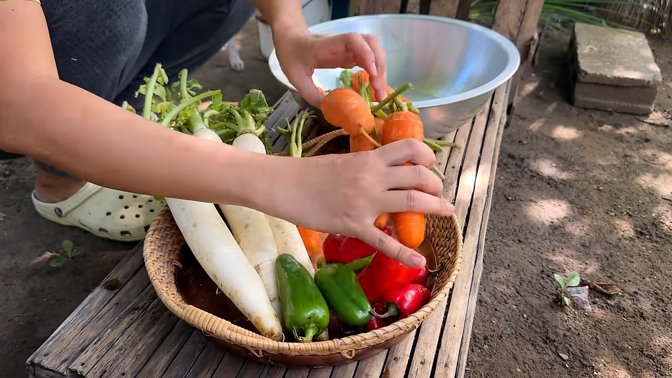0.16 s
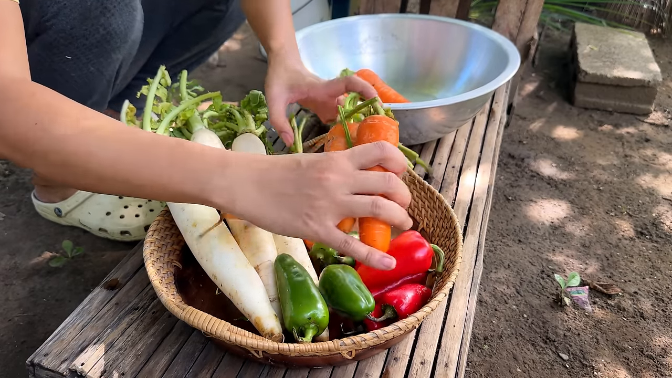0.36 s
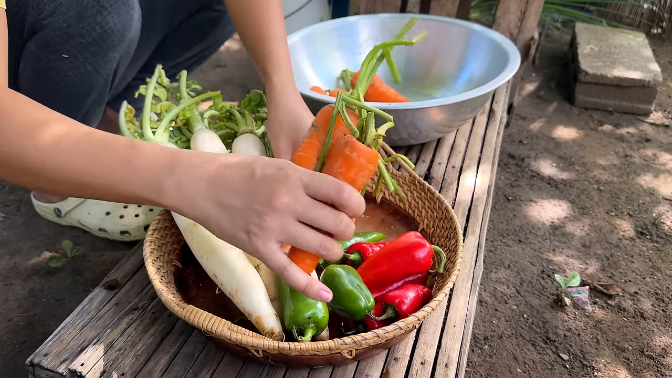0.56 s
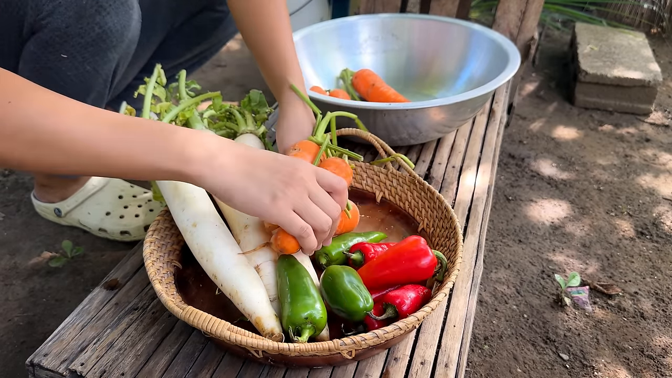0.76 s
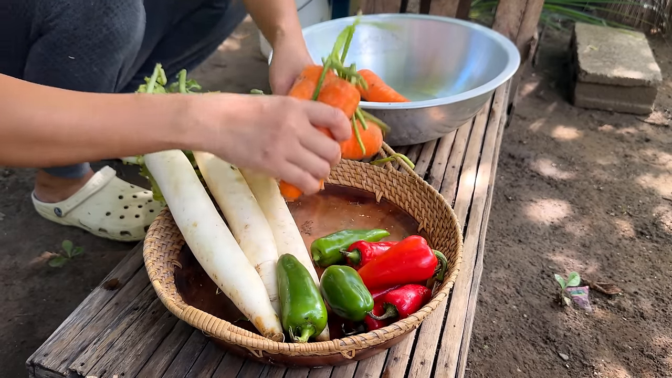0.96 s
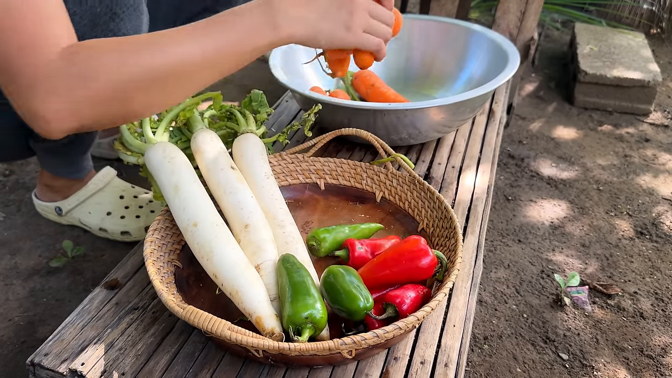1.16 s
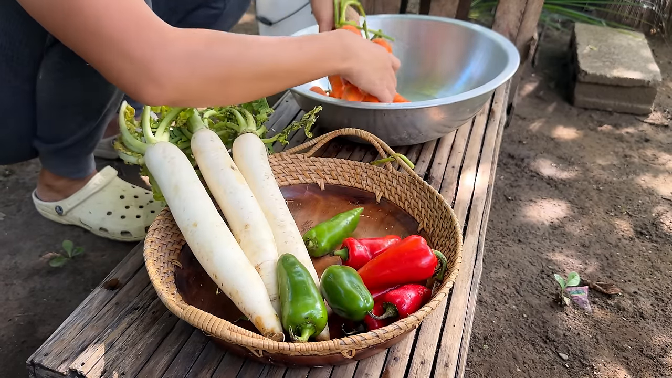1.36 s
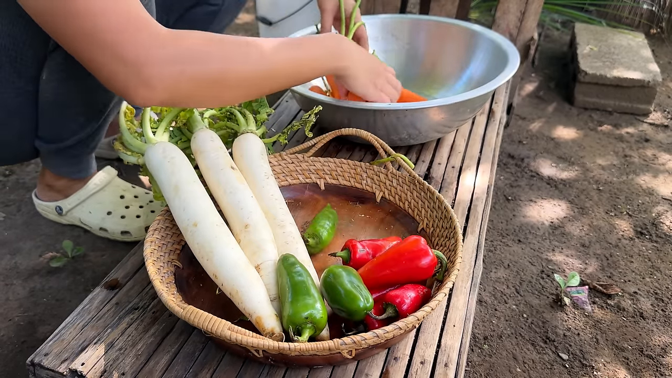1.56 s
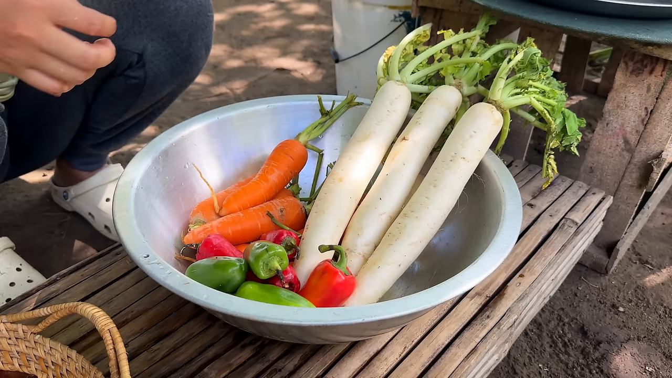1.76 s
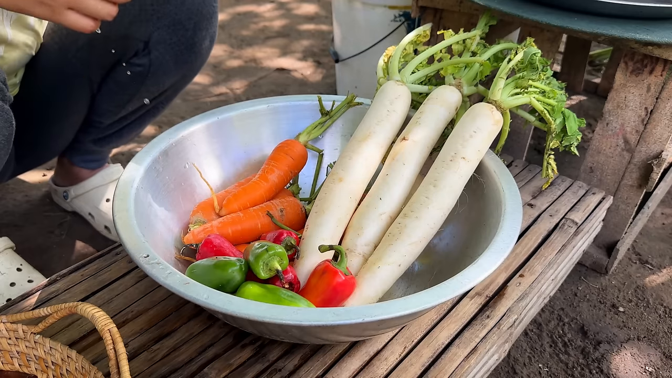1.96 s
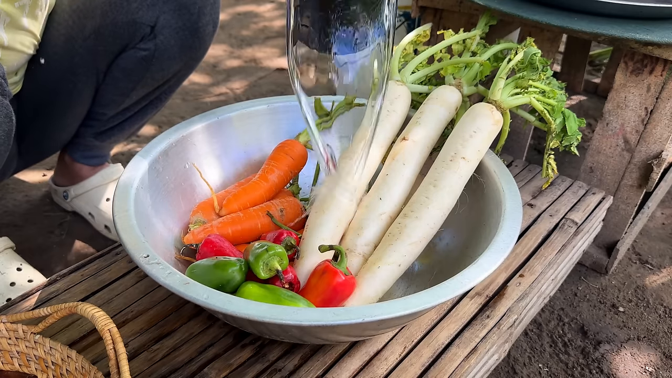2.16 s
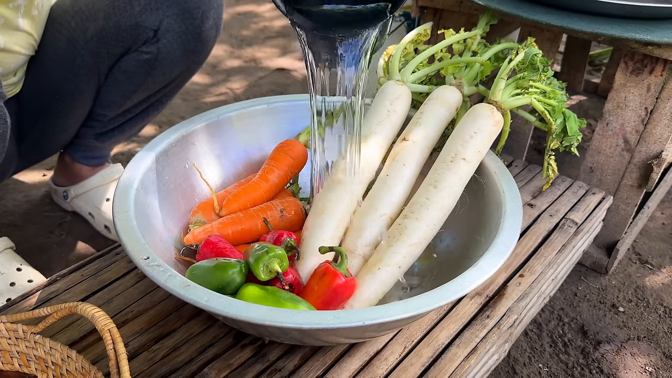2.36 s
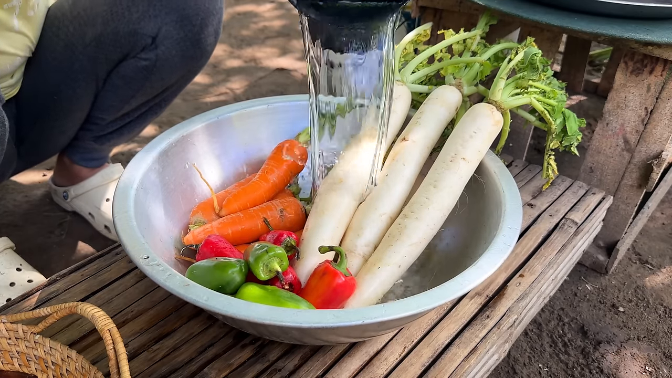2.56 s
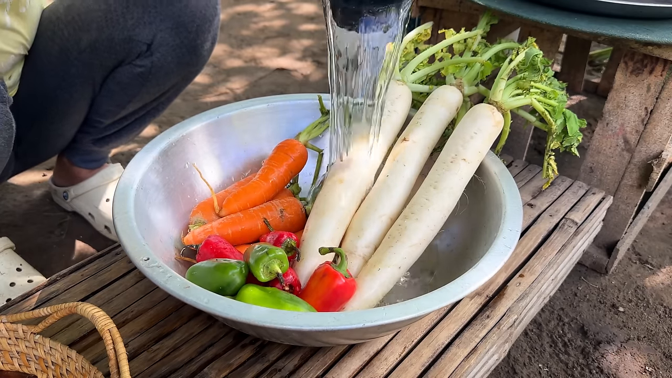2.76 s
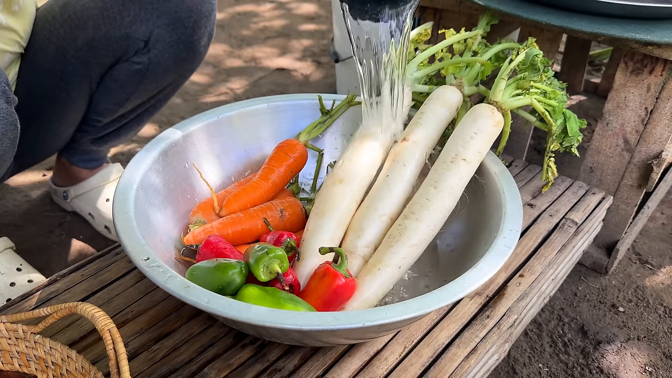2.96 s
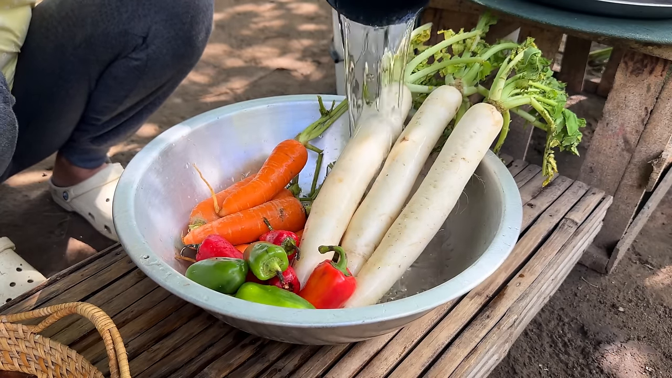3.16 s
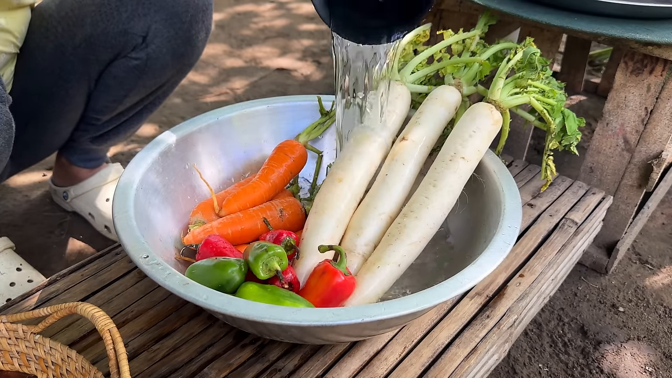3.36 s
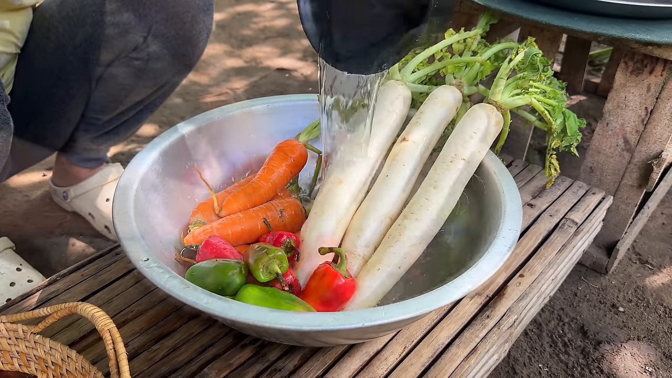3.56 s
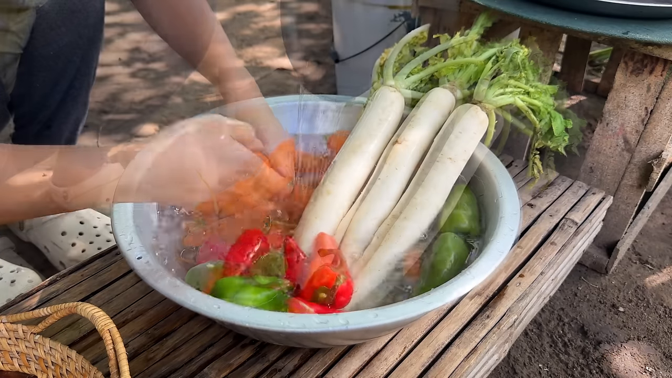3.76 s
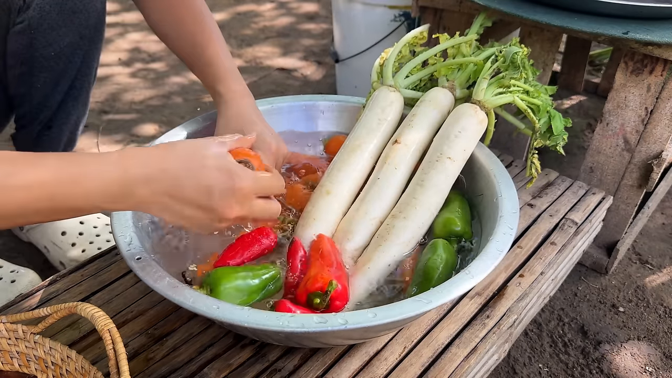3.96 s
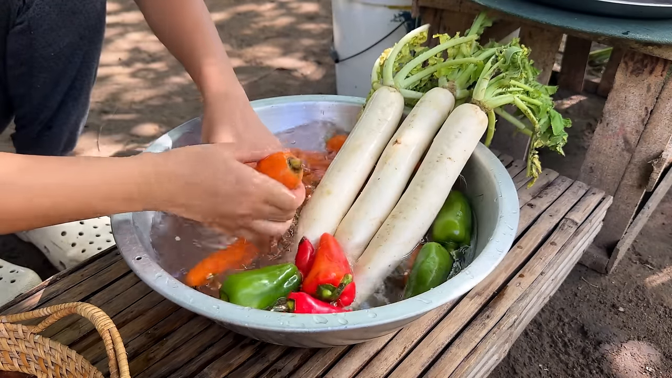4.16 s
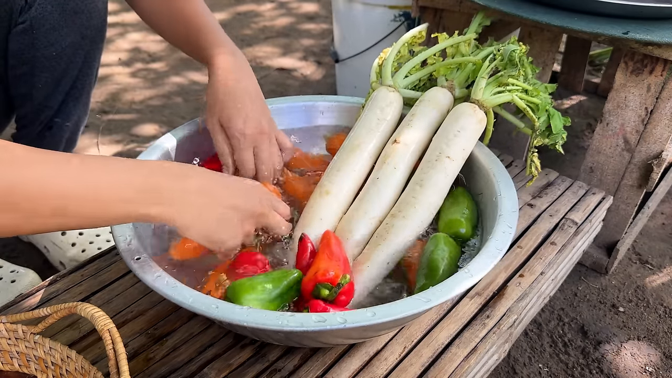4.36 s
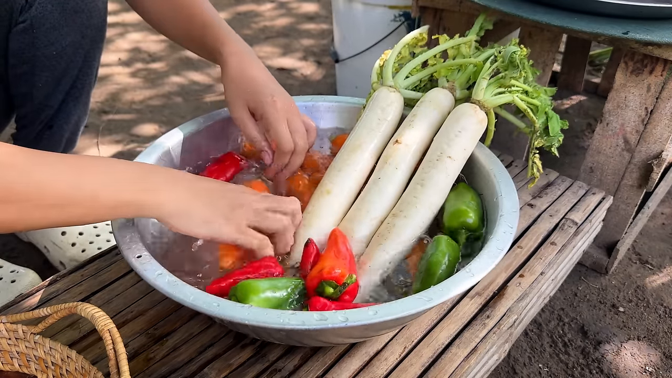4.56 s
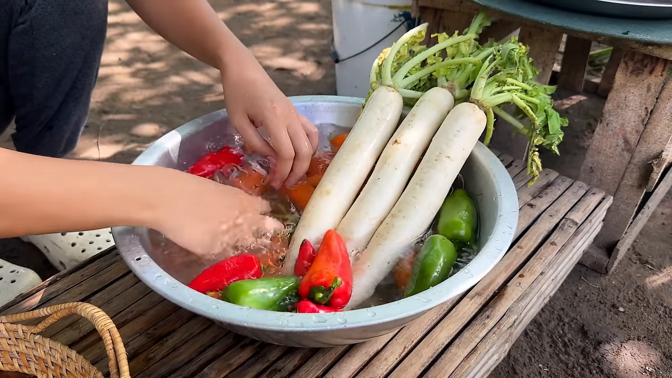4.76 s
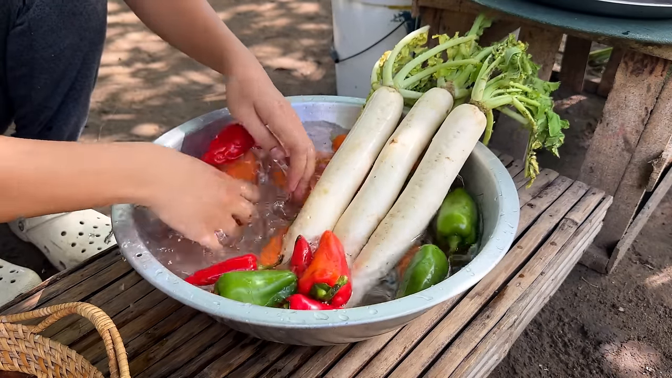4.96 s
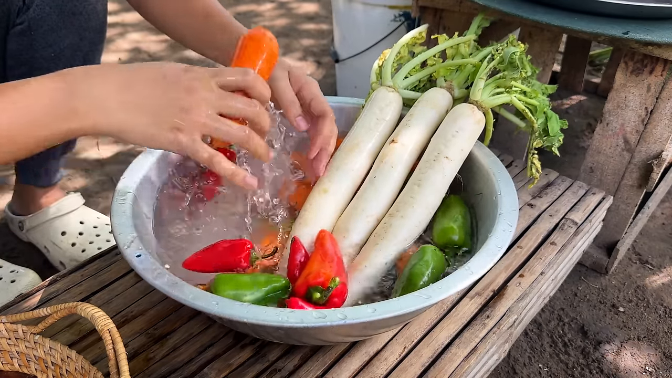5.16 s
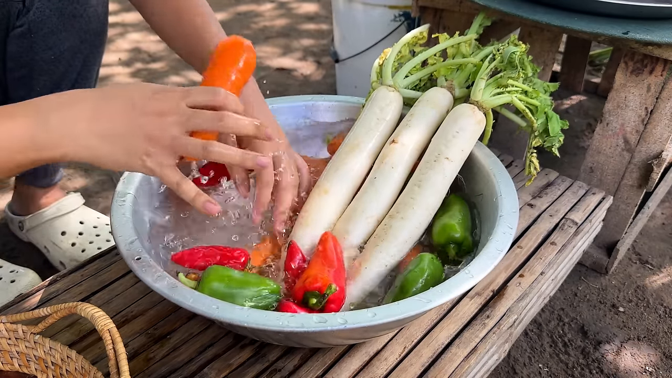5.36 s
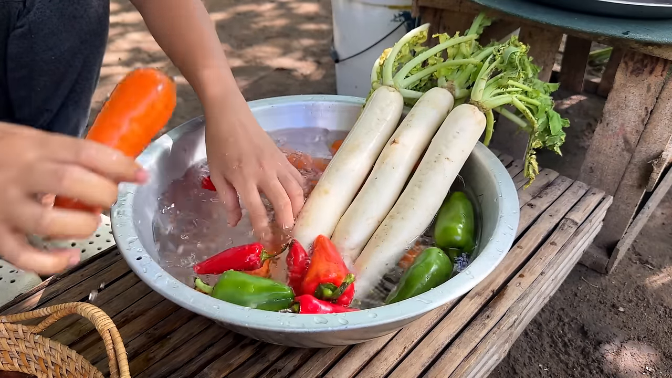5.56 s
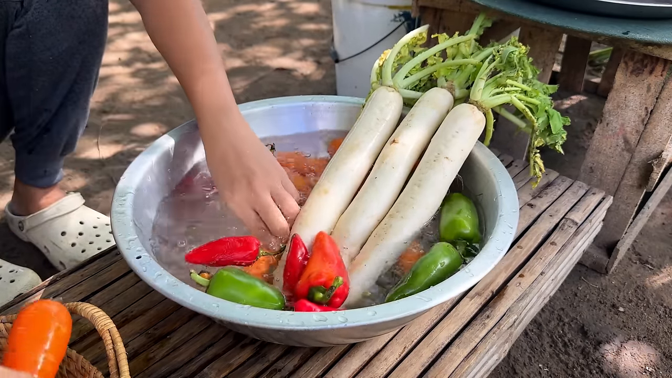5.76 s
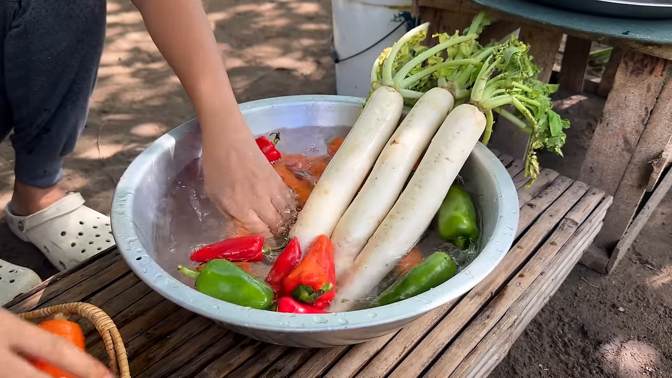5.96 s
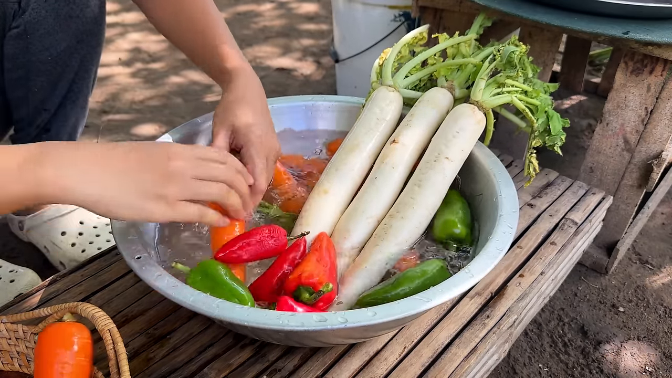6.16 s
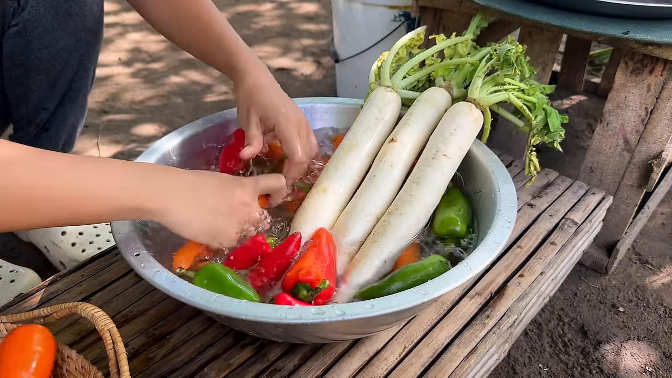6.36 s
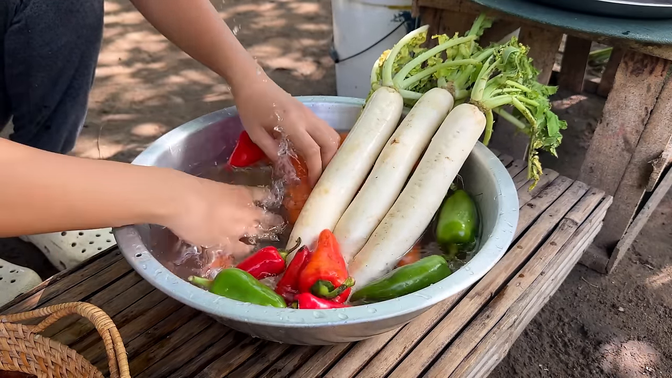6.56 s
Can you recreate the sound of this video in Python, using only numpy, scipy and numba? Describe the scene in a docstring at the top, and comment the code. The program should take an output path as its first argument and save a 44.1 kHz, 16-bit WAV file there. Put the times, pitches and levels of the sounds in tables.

```python
"""Vegetables are washed in a basin: water pours from a bucket, then hands slosh (shaped bubble swarms and noise).
Air pockets plop as rising, decaying sines; slaps are short filtered noise bursts.
Before that, more distantly, carrots knock in a basket and thud into the metal basin (struck modes and noise).
Chicks peep throughout and hens murmur in the first second (gliding tones), over yard air (noise)
and a far engine (low sine). At 1.757 s the scene jumps close to the basin; two basket knocks come later."""
import sys
import numpy as np
from scipy import signal
from scipy.fft import rfft, irfft, next_fast_len
from scipy.io import wavfile
from scipy.ndimage import uniform_filter1d
from numba import njit

SR = 44100
rng = np.random.default_rng(int(sys.argv[2]) if len(sys.argv) > 2 else 0)


def wrap_up_sound(samples):
    """Save the sound to the file named by the first command line argument, as 16-bit audio."""
    columns = np.atleast_2d(samples).T
    # keep every value between -1 and 1, then stretch to whole-number steps
    tamed = np.clip(columns, -1, 1)
    steps = np.round(tamed * 32767).astype(np.int16)
    wavfile.write(sys.argv[1], SR, steps)


N = 291060
TIME = np.arange(N) / SR
JUMP_S = 1.757  # from the distant view to the close one
# spray and drop spectrum: (frequency [Hz], gain [dB])
SPRAY_SPECTRUM = [(1500, -6), (2600, 0.5), (5500, 0.5), (7200, -6), (8500, -3), (10000, -9.5), (14300, -4)]


def amp(db):
    """Decibels to gain."""
    return 10 ** (np.asarray(db) / 20)


def unit(x):
    """Scale to rms 1."""
    return x / np.sqrt(np.mean(x ** 2))


def curves(rows):
    """Interpolate each column of a time table at every sample."""
    s, *columns = np.transpose(rows)
    return [np.interp(TIME, s, c) for c in columns]


def during(start_s, end_s, fade_s=.01):
    """Gate: 1 between two moments, with linear ramps inside."""
    rise = np.clip((TIME - start_s) / fade_s, 0, 1)
    fall = np.clip((end_s - TIME) / fade_s, 0, 1)
    return rise * fall


def colour(x, points):
    """Causal minimum-phase filter through (Hz, dB) points, by way of the cepstrum."""
    hz, db = np.transpose(points)
    size = 2 * next_fast_len(x.shape[-1])
    bin_hz = np.arange(size // 2 + 1) * SR / size
    gain_db = np.interp(np.log(bin_hz + 1), np.log(hz), db)
    cepstrum = irfft(np.log(amp(gain_db)))
    # fold onto positive time
    cepstrum[1:size // 2] *= 2
    cepstrum[size // 2 + 1:] = 0
    return irfft(rfft(x, size) * np.exp(rfft(cepstrum)))[..., :x.shape[-1]]


def walk(rate_hz):
    """Slow random curve of rms about 1: smoothed random steps."""
    k = int(SR / rate_hz)
    steps = np.repeat(rng.standard_normal(N // k + 1), k)
    return unit(uniform_filter1d(steps, k)[:N])


def add(out, s, sound):
    """Mix a sound in at a moment."""
    i = max(int(s * SR), 0)
    out[..., i:i + sound.shape[-1]] += sound[..., :max(N - i, 0)]


def ticks(length_s):
    """Time axis of a short sound."""
    return np.arange(int(length_s * SR)) / SR


def place(x, lead_ms, pan_db, echo_db, t60):
    """Stereo position by left lead and left-over-right level, plus decaying scatter unlike in each port."""
    t = ticks(0.27)
    scatter = rng.standard_normal((2, len(t))) * amp(-60 * t / t60) * (1 - np.exp(-t / 0.0018))
    scatter = colour(scatter / np.sqrt(np.sum(scatter[0] ** 2)), [(200, 0.42), (1000, 4.9), (2500, 9.2)])
    left = x * amp(pan_db / 2)
    right = np.interp(TIME - lead_ms / 1000, TIME, x) * amp(-pan_db / 2)
    echoes = signal.fftconvolve(x[None], scatter, axes=1)[:, :N]
    return np.array([left, right]) + amp(echo_db) * echoes


@njit
def ring(s, size, hz, cycles, glide):
    """Bubbles: sines that swell within a cycle or two, fade 50 dB in their cycles and rise by the glide share."""
    out = np.zeros(N)
    for k in range(len(s)):
        start = max(int(s[k] * SR), 0)
        n = int(cycles[k] * SR / hz[k])
        phase = 0.
        for i in range(min(n, N - start)):
            phase += hz[k] * (1 + glide * i / n) / SR
            envelope = (1 - np.exp(-phase * phase)) * np.exp(-5.8 * i / n)
            out[start + i] += size[k] * envelope * np.sin(2 * np.pi * phase)
    return out


def cloud(count, low_hz, high_hz, cycles, spread_db, lead_ms, wide_ms):
    """Bubble swarm with random pitches, levels and lives; each bubble has its own stereo place."""
    when, pitch, chance, life, across, pan = rng.random((count, 6)).T
    hz = low_hz * (high_hz / low_hz) ** pitch
    size = amp(-spread_db * np.log(chance + 0.00087)) * hz / high_hz  # spread_db > 0: a few far louder
    lead_s = (lead_ms + wide_ms * (2 * across - 1)) / 1000
    ports = []
    for side in (1, -1):
        start_s = when * N / SR - side * lead_s / 2
        side_size = size * amp(side * 8.6 * (pan - .5))
        ports.append(ring(start_s, side_size, hz, cycles * (.5 + life), 0.17))
    return unit(np.array(ports))


def yard(points, db):
    """Outdoor air as filtered noise: near-central rumble and wider hiss, each wavering on its own."""
    mid = colour(rng.standard_normal(N), points)
    side = colour(colour(rng.standard_normal(N), points), [(100, -17.0), (600, -1.5), (2500, 0.0)])
    air = unit(mid + side * np.array([[1], [-1]])) * amp(db)
    rumble = signal.sosfiltfilt(signal.butter(2, 220, fs=SR, output="sos"), air)
    hiss = air - rumble
    return rumble * amp(2.3 * walk(14)) + hiss * amp(3.83 * walk(10))


def hum(rows, waver_db):
    """Far engine: its lowest note alone, a sine wavering in pitch and, where waver_db is set, in level."""
    hz, db = curves(rows)
    phase = 2 * np.pi * np.cumsum(hz * (1 + 0.011 * walk(8.84))) / SR
    tone = np.sqrt(2) * np.sin(phase) * amp(db + waver_db * walk(11))
    return tone * amp([[-.9], [.7]])  # left, right


def hens():
    """Soft, closed-beak murmurs: straight pitch glides with a weak second harmonic."""
    # hen murmurs: (time [s], length [s], start pitch [Hz], end pitch [Hz], level [dB])
    murmurs = [(0, 0.5, 630, 643, -59.5), (0.085, 0.1, 431, 282, -43), (0.571, 0.082, 331, 300, -40),
               (.839, 0.071, 385, 338, -50.5)]
    out = np.zeros(N)
    for s, length_s, start_hz, end_hz, db in murmurs:
        u = ticks(length_s) / length_s
        phase = 2 * np.pi * np.cumsum(start_hz + (end_hz - start_hz) * u) / SR
        voice = np.sin(phase) + amp(-15.5) * np.sin(2 * phase)
        add(out, s, amp(db) * np.sin(np.pi * u) * voice)
    return place(out, lead_ms=0, pan_db=-1.0, echo_db=-3.5, t60=0.4)


def peep(length_s, top_hz, end_hz):
    """A near-pure, wavering whistle that leaves its top slowly, then falls faster and faster."""
    u = ticks(length_s) / length_s
    waver = 0.0089 * np.interp(u, np.linspace(0, 1, num=12), rng.standard_normal(size=12))
    hz = (top_hz + (end_hz - top_hz) * u ** 1.7) * (1 + waver)
    phase = 2 * np.pi * np.cumsum(hz) / SR
    return np.sqrt(np.sin(np.pi * u)) * amp(-3 * u) * (np.sin(phase) + amp(-25) * np.sin(2 * phase))


def chicks():
    """Falling whistles: a few chicks close by and a random flock on either side, blurred by echoes."""
    # nearest chicks: (time [s], length [s], top pitch [Hz], end pitch [Hz], level [dB])
    near_peeps = [(0, .07, 4850, 3410, -50), (0.026, 0.14, 5290, 4820, -53), (0.055, 0.13, 5050, 2700, -47),
                  (0.109, 0.15, 4550, 3160, -48), (0.364, .12, 5420, 3860, -53.5),
                  (0.5, 0.039, 5050, 4560, -50), (0.562, 0.084, 5050, 3140, -65),
                  (0.676, .038, 5070, 4530, -54), (0.711, .1, 5050, 3220, -58),
                  (0.777, .09, 5300, 4040, -52), (.803, 0.16, 4980, 3330, -46),
                  (0.902, 0.09, 5280, 4600, -53), (0.965, 0.095, 5330, 4570, -56),
                  (0.993, 0.04, 4350, 3360, -52), (1.085, 0.029, 3650, 2490, -45),
                  (1.14, .15, 4840, 4640, -58), (1.184, 0.085, 4450, 2950, -51.5),
                  (1.287, 0.052, 4680, 4280, -47), (1.298, 0.029, 3600, 2780, -50.5),
                  (1.348, 0.099, 5060, 3330, -52), (1.407, 0.14, 5380, 4390, -48.5),
                  (1.522, 0.038, 4050, 2620, -38.5), (1.776, .24, 4550, 2980, -60),
                  (4.302, 0.2, 4700, 4070, -51), (5.097, 0.22, 5000, 3670, -57),
                  (5.477, 0.16, 3700, 3120, -57.5), (5.713, 0.13, 4720, 3240, -55)]
    # flock before and after the jump: (highest top pitch [Hz], level [dB])
    flock_before = (5900, -57.5)
    flock_after = (4800, -64.5)
    peeps_per_s, low_hz, mean_length_s = 19, 4030, .11  # flock, on each side
    fall_share = .36  # of the top pitch
    near = np.zeros(N)
    for s, length_s, top_hz, end_hz, db in near_peeps:
        add(near, s, amp(db) * peep(length_s, top_hz, end_hz))
    flock = 0
    for side in (1, -1):
        far = np.zeros(N)
        for k, (when, length, pitch, size) in enumerate(rng.random(size=(130, 4))):
            s = (k + when - 1) / peeps_per_s
            high_hz, _ = flock_before if s < JUMP_S else flock_after
            top_hz = low_hz * (high_hz / low_hz) ** pitch
            call = peep(mean_length_s * (.5 + length), top_hz, top_hz * (1 - fall_share))
            add(far, s, amp(-10 * size) * call)
        flock = flock + place(far, lead_ms=.3 * side, pan_db=3 * side, echo_db=-5, t60=.22)
    near = place(near, lead_ms=-.38, pan_db=-1, echo_db=-10, t60=.2)
    flock_db = np.where(TIME < JUMP_S, flock_before[1], flock_after[1])
    return near + amp(flock_db) * unit(flock)


def blow(modes, bright_hz, crack_db, crack_t60):
    """A blow of peak 1: decaying modes and a noise crunch, both dulled by soft contact."""
    t = ticks(.3)
    body = 0
    for hz, db, t60 in modes:
        envelope = amp(db + 4.2 * rng.standard_normal() - 60 * t / t60)
        mode_hz = hz * (1 + 0.014 * rng.standard_normal())
        body = body + envelope * np.sin(2 * np.pi * (mode_hz * t + rng.random()))
    crunch = colour(rng.standard_normal(len(t)), [(100, -1.5), (520, 16.5), (1400, 4.5), (12000, -1.5)])
    crack = amp(crack_db - 60 * t / crack_t60) * crunch
    struck = (body + crack) * np.tanh(t / 0.0014)  # the carrot gives a little: gradual onset
    hit = signal.sosfilt(signal.butter(1, min(bright_hz, SR / 3), fs=SR, output="sos"), struck)
    return hit / np.abs(hit).max()


def carrots():
    """Modal knocks and noise scrapes in the basket; basin thuds favour modes near the place struck."""
    # basket knocks: (time [s], peak before echoes [dB], low-pass corner [Hz])
    knocks = [(.329, -9, 3000), (.339, -17.5, 1490), (0.361, -13.5, 900), (.466, -23.5, 497),
              (.476, -22, 500), (.495, -33.5, 500), (.513, -26, 500), (0.663, -28.5, 298),
              (5.869, -28.5, 2000), (5.892, -23, 1500)]
    # basket modes: (nominal frequency [Hz], mean level [dB], t60 [s])
    basket_modes = [(200, -7.5, 0.062), (508, 2, 0.045), (585, 5.5, 0.029), (804, -6, 0.037),
                    (1180, -16, 0.062), (1600, -10, 0.023), (2900, -8, 0.038)]
    # carrots rubbing on each other: (time [s], length [s], level [dB])
    scrapes = [(0.43, .039, -42.5), (0.515, 0.039, -45.5)]
    # scrape spectrum: (frequency [Hz], gain [dB])
    scrape_spectrum = [(300, -2), (1200, 4.5), (2100, -10), (2800, 4), (3500, -13), (12000, -27)]
    # landings in the basin: (time [s], peak before placing [dB], low-pass corner [Hz], favoured ring [Hz])
    thuds = [(1.428, -23, 1380, 895), (1.452, -26, 900, 710), (1.526, -17, 2400, 882),
             (1.538, -21.5, 2020, 1156), (1.551, -23, 2000, 356), (1.564, -30.5, 2300, 356),
             (1.630, -20.5, 900, 726), (1.635, -18, 890, 494), (1.647, -24, 1490, 250),
             (1.666, -21, 800, 1320), (1.709, -29.5, 3400, 2052)]
    # basin modes: (nominal frequency [Hz], mean level before the strike boost [dB], t60 [s])
    basin_modes = [(185, -6, 0.16), (253, 3.5, 0.14), (351, 0.5, 0.14), (454, -9.5, 0.31), (596, -4, .12),
                   (737, -5, 0.11), (885, -0.5, 0.039), (1156, -1, 0.057), (1350, -10.5, 0.16),
                   (1560, -8, 0.12), (2100, -15, 0.14), (2790, -12.5, .08)]
    boost_db, boost_octaves = 9, 0.23  # strike boost and its width
    basket, basin = np.zeros(N), np.zeros(N)
    for s, db, bright_hz in knocks:
        add(basket, s, amp(db) * blow(basket_modes, bright_hz, crack_db=-1.0, crack_t60=0.031))
    for s, length_s, db in scrapes:
        swell = np.hanning(len(ticks(length_s)))
        rub = unit(colour(rng.laplace(size=len(swell)), scrape_spectrum))
        add(basket, s, amp(db) * swell * rub)
    for s, db, bright_hz, ring_hz in thuds:
        modes = []
        for hz, mode_db, t60 in basin_modes:
            nearness = np.exp(-(np.log2(hz / ring_hz) / boost_octaves) ** 2)
            modes.append((hz, mode_db + boost_db * nearness, t60))
        add(basin, s, amp(db) * blow(modes, bright_hz, crack_db=3.5, crack_t60=0.11))
    basket = place(basket, lead_ms=0.019, pan_db=0.0, echo_db=-15.5, t60=0.2)
    basin = place(basin, lead_ms=-0.026, pan_db=-2.0, echo_db=-14, t60=0.23)
    return basket + basin * during(-1, JUMP_S, fade_s=0.0025)


def bumps():
    """Low, short decaying sines: soft thumps while the bucket is brought over and tipped."""
    # bucket thumps: (time [s], level [dB], pitch [Hz])
    thumps = [(1.96, -11, 102), (2.239, -10.5, 112)]
    s, db, hz = np.array(thumps, float).T.copy()
    return ring(s, amp(db), hz, np.full(len(s), 4.5), 0.)


def splats():
    """Water slaps: noise bursts that swell briefly and fade, each with its own brightness."""
    # slaps: (time [s], peak before placing [dB], reference brightness [Hz])
    slaps = [(2.17, -28.5, 6200), (4.088, -27, 8140), (4.236, -25.5, 9000), (4.287, -17, 4820),
             (4.402, -18, 9100), (4.670, -19.5, 7900), (4.748, -23, 5900), (4.818, -11.5, 15000),
             (5.129, -25.5, 9000), (5.295, -25.5, 5000), (5.407, -28.5, 8040), (5.785, -28, 2500),
             (6.213, -17.5, 13900), (6.229, -22.5, 5000), (6.331, -18, 5000), (6.470, -13, 4300)]
    # slap spectrum: (multiple of the reference brightness [1], gain [dB])
    slap_spectrum = [(.06, -4), (.3, -1), (1, -5.5), (2.5, -14.5)]
    swell_s = 0.00057  # time to the envelope's peak
    out, t = np.zeros(N), ticks(0.048)
    for s, db, bright_hz in slaps:
        noise = rng.laplace(size=len(t)) * t * np.exp(-t / swell_s)
        burst = colour(noise, [(bright_hz * k, gain_db) for k, gain_db in slap_spectrum])
        add(out, s, burst * amp(db) / np.abs(burst).max())
    return place(out, lead_ms=0.13, pan_db=-0.5, echo_db=-10.5, t60=0.039)


def plops():
    """Large air pockets close under the stream and behind the hands: rising sines, single or in gurgling swarms."""
    # single air pockets: (time [s], level [dB], starting pitch [Hz], life [cycles])
    pockets = [(2.551, -17, 1236, 41), (2.762, -23, 1310, 26), (2.992, -24.5, 704, 13.4),
               (3.095, -21.5, 1300, 22), (3.503, -28.5, 770, 24), (3.708, -27, 1070, 22),
               (3.906, -26, 1650, 19), (4.007, -26, 1255, 15.5), (4.158, -26, 1450, 11.3),
               (4.2885, -7.5, 1420, 13), (4.751, -9, 1460, 7.7), (4.752, -23, 715, 13),
               (4.817, -12, 1850, 8.3), (5.028, -6.5, 1650, 7.5), (5.04, -19, 1270, 15),
               (5.114, -19, 940, 5.3), (5.139, -22, 1160, 8), (5.154, -34.5, 570, 40),
               (5.176, -21, 1158, 8.4), (5.210, -24.5, 1746, 29), (5.294, -31.5, 1320, 51),
               (6.139, -22.5, 1841, 60), (6.178, -22, 1083, 53), (6.247, -30, 637, 24),
               (6.421, -16.5, 716, 14.3), (6.514, -14, 241, 7.3), (6.571, -19, 1260, 18)]
    # gurgles: (time [s], span of onsets [s], middle pitch [Hz], peak before placing [dB])
    gurgles = [(2.535, .02, 934, -31.5), (2.663, 0.037, 2280, -28.5), (3.179, 0.14, 1920, -26),
               (4.279, 0.016, 775, -33), (4.647, .04, 1260, -29), (4.736, 0.029, 1320, -25),
               (4.802, .03, 1150, -22.5), (4.877, 0.0206, 384, -33), (5.045, 0.028, 1140, -33.5),
               (5.196, 0.041, 2200, -32), (5.364, 0.014, 635, -42), (5.893, 0.023, 377, -29),
               (6.108, .015, 1620, -34), (6.45, .02, 1305, -23), (6.466, .06, 560, -24)]
    s, db, hz, cycles = np.array(pockets, float).T.copy()
    out = ring(s, amp(db), hz, cycles, 0.04)
    for start_s, length_s, middle_hz, peak_db in gurgles:
        when, pitch, size, life = rng.random(size=(24, 4)).T
        pitch_hz = middle_hz * 1.9 ** (2 * pitch - 1)
        swarm = ring(start_s + length_s * when, amp(-14 * size), pitch_hz, 6 + 14 * life, 0.22)
        out += swarm * amp(peak_db) / np.abs(swarm).max()
    return place(out, lead_ms=0.1, pan_db=-1.0, echo_db=-10.0, t60=0.054)


def wash():
    """Countless tiny drops and films: a soft noise hiss, partly alike in both ports."""
    noise = rng.standard_normal(N) + rng.standard_normal((2, N))
    return unit(colour(noise, [(300, -1.0), (6000, -8.5), (14000, -31.0)]))


def mist():
    """Droplets too fine to be told apart: white noise, independent in each port."""
    return rng.standard_normal((2, N))


def stroke(s, length_s, release_db_per_s):
    """Hand stroke envelope: quick rise, hold, then a steady fade in decibels."""
    rise = np.clip((TIME - s) / 0.013, 0, 1)
    return rise * amp(-release_db_per_s * np.maximum(TIME - s - length_s, 0))


def stir():
    """Hands push the water: low bubbles and wash, with longer-lasting high drops, follow each stroke."""
    # hand strokes: (time [s], length [s], slosh level before lapping [dB], drop level before lapping [dB])
    strokes = [(3.765, 0.42, -57.5, -53.5), (4.23, 0.18, -52.5, -53), (4.441, 0.066, -45.5, -49),
               (4.582, 0.3, -46, -50), (5.014, 0.16, -49, -47), (5.28, .05, -60, -60.5),
               (5.76, 0.05, -53, -64), (6.152, 0.22, -48.5, -51), (6.393, .28, -41, -53.5)]
    # slosh spectrum: (frequency [Hz], gain [dB])
    slosh_spectrum = [(70, -8), (170, 2.5), (300, -3), (480, -10), (1200, -3), (1850, -1), (2600, -8),
                      (4500, -12.5)]
    settle_db_per_s, drip_db_per_s = 134, 94
    push = sum(amp(db) * stroke(s, length_s, settle_db_per_s) for s, length_s, db, _ in strokes)
    drip = sum(amp(db) * stroke(s, length_s, drip_db_per_s) for s, length_s, _, db in strokes)
    lap = walk(40)
    bubbles = cloud(count=3000, low_hz=264.0, high_hz=5220, cycles=39,
                    spread_db=3.0, lead_ms=.12, wide_ms=0.12)
    slosh = unit(colour(bubbles + amp(-5.5) * wash(), slosh_spectrum))
    droplets = cloud(count=14000, low_hz=2560, high_hz=14600, cycles=14,
                     spread_db=4.5, lead_ms=.11, wide_ms=0.045)
    drops = unit(colour(droplets + amp(0.5) * mist(), SPRAY_SPECTRUM))
    return slosh * push * amp(3.7 * lap) + drops * drip * amp(3.3 * lap)


def pour():
    """The stream drums and traps ringing bubbles in bursts, under a fine spray of drops and noise."""
    # the pour swells, holds and thins as the bucket empties:
    # (time [s], body level before surges [dB], spray level before surges [dB])
    flow = [(2.1, -73.5, -69), (2.216, -48.5, -43), (2.254, -36, -37.5), (2.464, -45.5, -46.5),
            (2.664, -40, -42), (3.152, -44.5, -40), (3.23, -43.5, -35.5), (3.562, -44, -47),
            (3.702, -42, -44.5), (3.85, -49, -59)]
    # stream body spectrum: (frequency [Hz], gain [dB])
    body_spectrum = [(200, -6), (450, -10), (760, 5.5), (920, -11), (1270, 5.5), (1520, -5.5), (1820, 1),
                     (3200, -12.5)]
    body_db, spray_db = curves(flow)
    surge = walk(55)
    patter = cloud(count=9000, low_hz=255.0, high_hz=3430, cycles=26.3,
                   spread_db=0.0, lead_ms=0.041, wide_ms=0.056)
    bubbling = cloud(count=1800, low_hz=910, high_hz=2002, cycles=31.6,
                     spread_db=2.0, lead_ms=0.1, wide_ms=0.08)
    body = unit(colour(patter + bubbling * amp(3.2 * walk(16)), body_spectrum))
    droplets = cloud(count=40000, low_hz=1950, high_hz=14800, cycles=35,
                     spread_db=4, lead_ms=0.099, wide_ms=0.25)
    spray = unit(colour(droplets + amp(1.5) * mist(), SPRAY_SPECTRUM))
    stream = body * amp(body_db + 0.97 * surge) + spray * amp(spray_db + 2.0 * surge)
    return stream * during(2.08, 3.85, fade_s=0.047)


def scene():
    """The first yard air, engine and basin thuds stop short at the jump; the close washing takes over."""
    # engine before and after the jump: (time [s], mean pitch [Hz], level before wavering [dB])
    hum_before = [(.5, 69.7, -39.5), (1.7, 67.8, -42.5)]
    hum_after = [(1.8, 54.5, -28.5), (2.8, 55.36, -27.5), (3.25, 53.46, -29), (3.7, 50.46, -35.5),
                 (4.05, 48.8, -49), (4.3, 55.6, -45.5), (6.6, 58.06, -53.5)]
    # yard air spectrum before and after the jump: (frequency [Hz], gain [dB])
    yard_before = [(35, -19), (70, 9.5), (120, 6.5), (400, -14), (800, -20), (2200, -28.5), (6000, -29.5),
                   (15000, -46.5)]
    yard_after = [(26, -17), (62, 8), (110, 3), (200, -8.5), (400, -24), (1100, -31.5), (6000, -36.5),
                  (15000, -46.5)]
    before = hum(hum_before, waver_db=0.0) + yard(yard_before, db=-46.5)
    water = bumps() + pour() + stir() + plops() + splats()
    after = water + hum(hum_after, waver_db=1.3) + yard(yard_after, db=-47)
    before = before * during(-1, JUMP_S, fade_s=0.0021)
    after = after * during(JUMP_S, 7, fade_s=0.027)
    return before + after + carrots() + chicks() + hens()


def record(dry):
    """Microphone: set the stereo width, notch the treble at the ports and cut above 16 kHz."""
    # side-signal gain: (frequency [Hz], gain [dB])
    side_gain = [(10000, 0.5), (13000, 0.5)]
    # microphone port notch: (frequency [Hz], gain [dB])
    port_notch = [(10400, 0), (11000, -16), (11600, -11.5), (12300, -1)]
    mid = dry.mean(axis=0)
    ports = colour(mid + colour(dry - mid, side_gain), port_notch)
    return signal.sosfilt(signal.ellip(8, .2, 70, 16000, fs=SR, output="sos"), ports)


dry = scene()
out = record(dry)
wrap_up_sound(out)
```